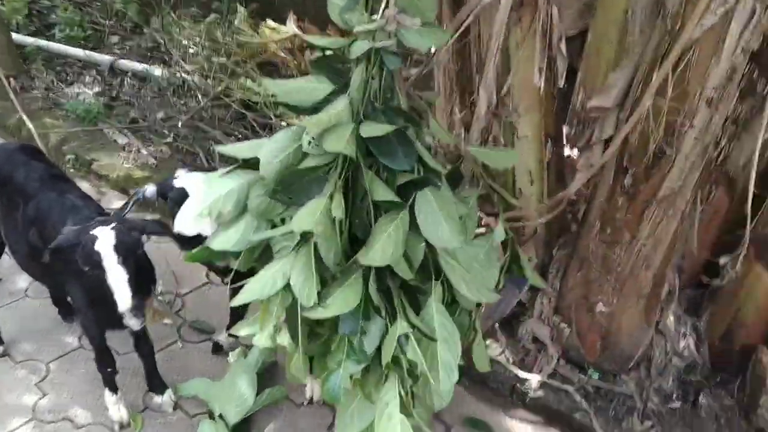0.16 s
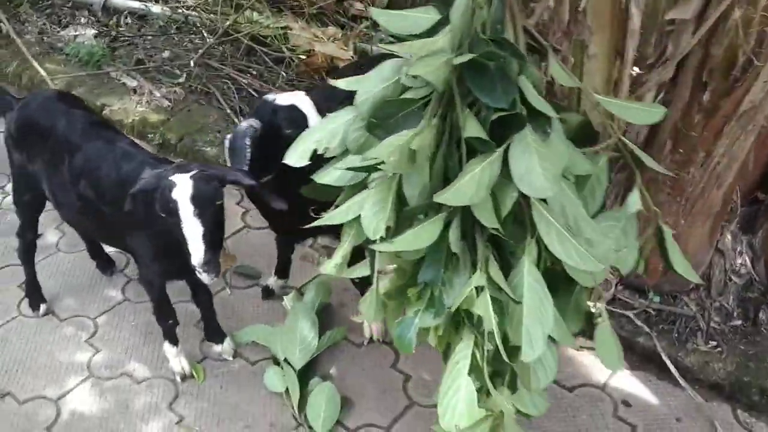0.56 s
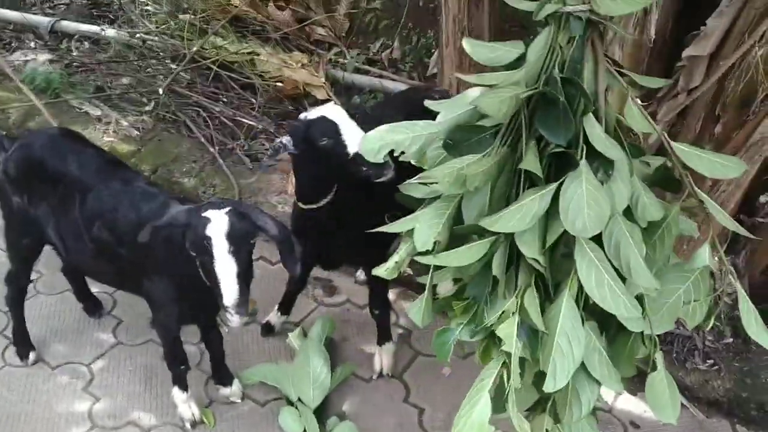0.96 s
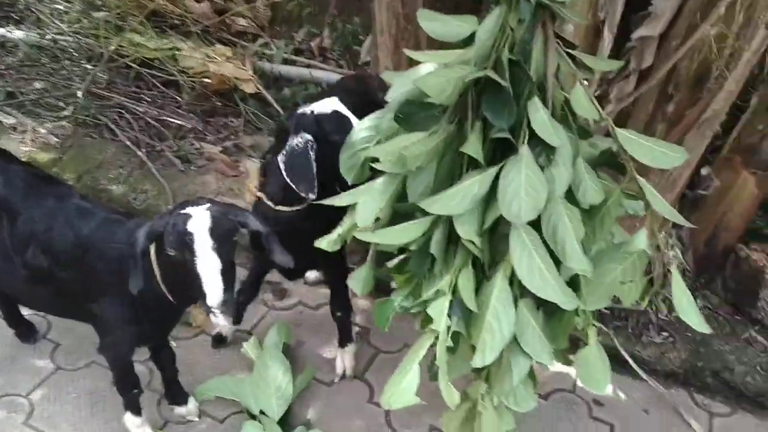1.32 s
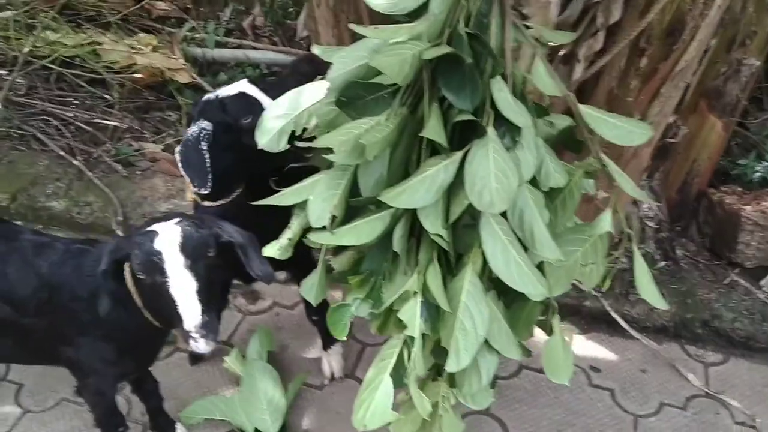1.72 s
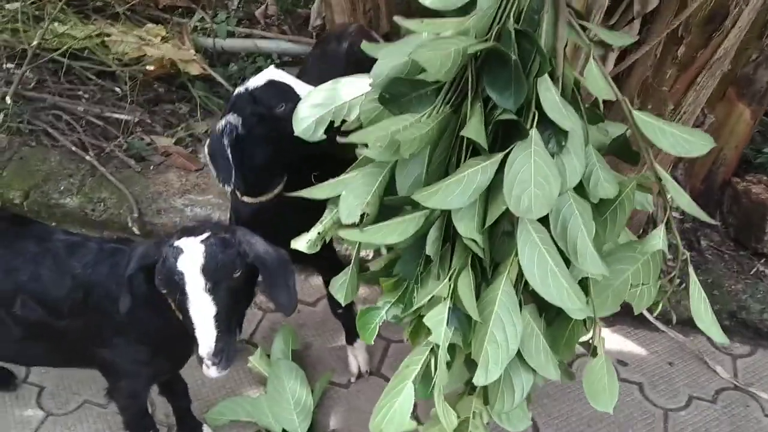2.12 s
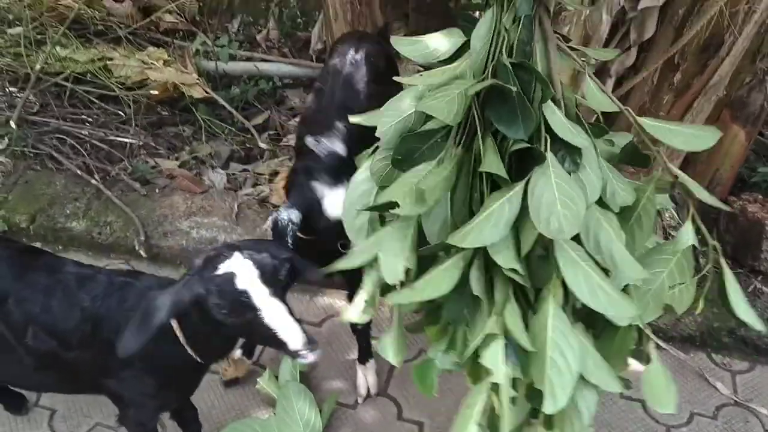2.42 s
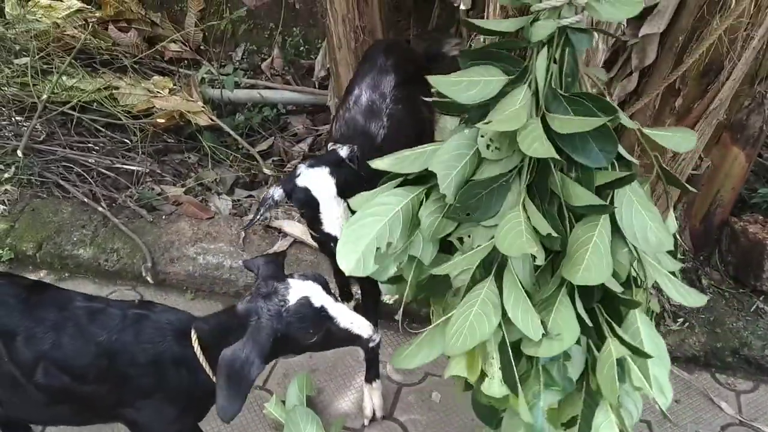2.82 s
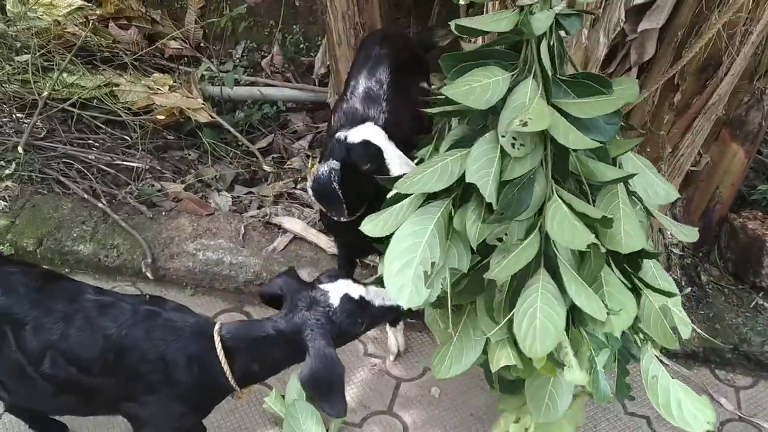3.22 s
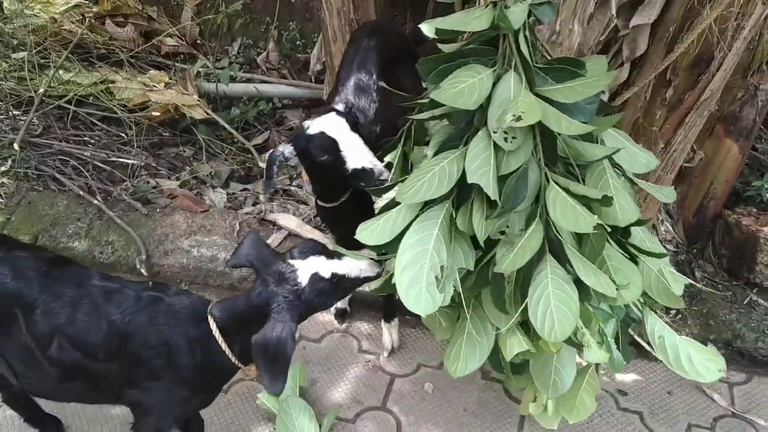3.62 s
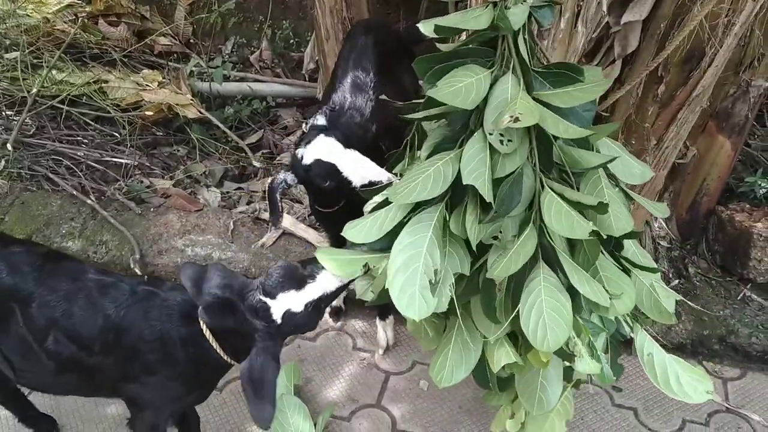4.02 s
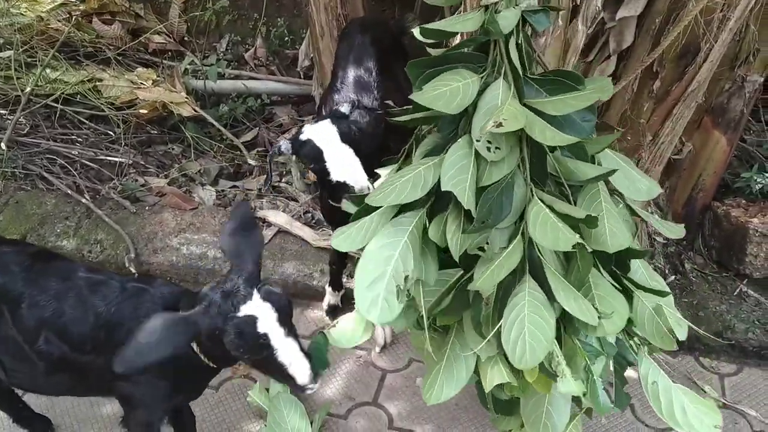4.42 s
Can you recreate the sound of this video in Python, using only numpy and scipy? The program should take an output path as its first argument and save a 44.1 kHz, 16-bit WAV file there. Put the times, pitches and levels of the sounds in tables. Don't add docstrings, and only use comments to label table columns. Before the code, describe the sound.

Leaves rustle and rip as goats tug a bundle, with sharp stalk cracks, quick bird twitter nearby and a far rising whoop over a soft outdoor hiss.

```python
import sys
import numpy as np
from scipy import signal
from scipy.fft import rfft, irfft
from scipy.io import wavfile
from scipy.ndimage import uniform_filter1d, map_coordinates

SR = 44100
rng = np.random.default_rng(int(sys.argv[2]) if len(sys.argv) > 2 else 0)


def wav_record(signal):
    frames = np.transpose(np.atleast_2d(signal))
    bounded = np.clip(frames, -1, 1)
    quanta = np.round(bounded * 32767).astype(np.int16)
    wavfile.write(sys.argv[1], SR, quanta)


def invert_db(x):
    u = np.asarray(x, float) / 20
    return 10 ** u


N = 201404


def unit(x):
    return x / np.sqrt(np.mean(x ** 2) + 1e-20)


def along(points, hz):
    point_hz, value = np.transpose(points)
    return np.interp(np.log(hz + 1), np.log(point_hz + 1), value)


def over_time(points):
    return np.interp(np.arange(N) / SR, *np.transpose(points))


def wobble(rate_hz):
    points = rng.standard_normal(int(N * rate_hz / SR) + 4)
    return map_coordinates(points, [np.arange(N) * rate_hz / SR])


def coloured(x, spectrum):
    gain = invert_db(along(spectrum, np.fft.rfftfreq(4096, 1 / SR)))
    cepstrum = irfft(np.log(gain + 1e-6))
    cepstrum[1:2048] *= 2
    cepstrum[2049:] = 0
    ring = irfft(np.exp(rfft(cepstrum)))[:2048]
    return signal.fftconvolve(x, ring)[:len(x)]


def patchy(patchy_db):
    z = signal.stft(rng.standard_normal(N + 512), nperseg=512)[2]
    field = uniform_filter1d(rng.standard_normal(z.shape), size=5, axis=0)
    field = uniform_filter1d(field, size=8, axis=1)
    noise = signal.istft(z * invert_db(patchy_db * unit(field)), nperseg=512)[1]
    return unit(noise[:N])


# pitch_hz, time_to_fall_60_db_s
TREE_ECHO = [(500, 0.55), (1000, 0.96), (2600, 0.88), (6300, 0.54), (10000, 0.2)]


def among_trees(x, wet_db, shorten):
    hz, t, z = signal.stft(rng.standard_normal(SR), SR, nperseg=256)
    t60_s = shorten * along(TREE_ECHO, hz)[:, None]
    tail = signal.istft(z * invert_db(-60 * t / t60_s), SR, nperseg=256)[1]
    tail = tail / np.sqrt(np.sum(tail ** 2) * 0.56)
    return x + invert_db(wet_db) * signal.fftconvolve(x, tail)[:N]


# pitch_hz, level_db (per Hz)
YARD_COLOUR = [(18, -45), (30, -30.5), (120, -4), (212, -14), (296, -0.5), (606, -3.5), (1180, -11.5),
               (1300, -11.5), (2860, 0), (4190, -14.5), (7070, -7.5), (7970, -23), (8980, -58.5),
               (10300, -51.5), (19800, -45)]
# time_s, level_db
LULLS = [(0, 2), (1.27, -1.5), (1.4, -6.5), (1.52, -3), (1.7, 1), (3.96, 2), (4.03, -2), (4.1, 1.5),
         (4.57, -4)]


def yard():
    breath_db = 0.8 * wobble(3) + over_time(LULLS)
    return invert_db(-59 + breath_db) * unit(coloured(patchy(patchy_db=1.5), YARD_COLOUR))


def crackle(per_s, spread_db):
    popping = rng.random(N) < per_s / SR
    size = np.minimum(rng.exponential(size=N), 4)
    sign = np.sign(rng.standard_normal(N))
    return unit(popping * invert_db(spread_db * size) * sign)


def pings(count, column_hz, scatter, cycles):
    draw = rng.random((count, 2))
    t = np.arange(600) / SR
    start = (draw[:, :1] * N).astype(int)
    hz = column_hz[start] * np.exp(scatter * rng.standard_normal((count, 1)))
    strength_db = -1.5 * np.log(draw[:, 1:] + 0.069)
    fade = invert_db(strength_db - 60 * t * hz / cycles)
    onset = 1 - np.exp(-t / 0.00012)
    ring = fade * onset * np.sin(2 * np.pi * hz * t)
    samples = (start + np.arange(len(t))).ravel()
    return unit(np.bincount(samples, ring.ravel(), N + len(t))[:N])


def swell(strokes, rest_db, steep):
    t = np.arange(N) / SR
    power = invert_db(2 * rest_db)
    for peak_s, rise_s, fall_s, db in strokes:
        away = np.maximum((peak_s - t) / rise_s, (t - peak_s) / fall_s)
        power = power + invert_db(2 * (db - steep * 20 * away))
    return 10 * np.log10(power)


# peak_s, rise_s, fall_s, rustle_db,
# brightness_db
TUGS = [(0.599, 0.041, 0.089, -40, -3.5), (0.938, 0.071, 0.082, -41.5, -5.5), (1.98, 0.13, .1, -40.5, -4),
        (2.137, 0.011, 0.081, -36, -6.5), (2.276, 0.066, 0.55, -39, -6.5), (2.333, 0.038, 0.26, -37.5, 0),
        (2.507, 0.074, 0.37, -40.5, -4), (2.593, 0.042, 0.047, -43, -8), (2.728, 0.053, 0.028, -37.5, -7),
        (4.2, 0.16, .1, -44.5, -18), (4.216, 0.0034, 0.024, -31, 2), (4.282, 0.055, 0.13, -33.5, -0.5),
        (4.35, 0.2, 0.092, -34.5, -0.5), (2.44, 0.059, 0.019, -39, -18), (0.005, .1, 0.12, -51.5, 0.5),
        (1.03, 0.28, 0.16, -55.5, 4)]
# peak_s, rise_s, fall_s, rustle_db, brightness_db
STIRS = [(.07, 0.11, .3, -50, -3), (.5, 0.28, 0.082, -54.5, 0), (.77, .1, 0.21, -51, -3),
         (1.17, 0.6, 0.42, -53, -2.5), (1.59, 0.1, 0.056, -48, -7), (1.89, 0.61, .2, -56, -5.5),
         (2.66, .2, 0.36, -58, -16), (2.788, 0.017, 0.14, -45.5, -4), (2.964, 0.08, 0.026, -47.5, -5.5),
         (3.3, 1.35, 4.5, -55, -3), (3.8, 1.9, 0.11, -57, -24), (3.978, 0.068, 0.038, -64, -9),
         (4.51, 0.22, .3, -54, -18), (4.56, 0.076, .3, -56.5, 3)]
# peak_s, rise_s, fall_s, level_db
NUDGES = [(2.129, 0.0037, 0.054, -38.5), (2.325, .005, 0.072, -46), (2.43, 0.05, 0.045, -49),
          (2.288, 0.08, 0.22, -47.5), (2.509, .05, 0.094, -43.5), (2.593, 0.021, 0.085, -45.5),
          (2.726, 0.082, 0.017, -48), (2.786, 0.0053, 0.026, -53.5), (2.8, 0.12, 0.35, -57)]
# time_s, pitch_hz
BLADE_PITCH = [(0, 2593), (1.0, 2737), (1.101, 2400), (1.9, 2555), (2.0, 2830), (2.3, 2777), (2.6, 2285),
               (2.72, 2686), (4.1, 2680), (4.3, 3154), (4.57, 2900)]
# pitch_hz, level_db
LEAF_COLOUR = [(900, -50.5), (1500, -10), (2300, -1.5), (3000, 5), (3500, -1.5), (3900, -11.5), (4400, -52)]
# pitch_hz, level_db
EDGE_COLOUR = [(3300, -51.5), (4000, -6), (5200, -3), (6500, -1), (7500, -2), (8300, -15), (8900, -39),
               (9600, -53.5), (11000, -120)]
# pitch_hz, level_db
STALK_COLOUR = [(60, -52.5), (150, -13), (300, -2.5), (600, -6), (1000, 1.5), (1500, -2.5), (2000, -4),
                (2600, -69.5)]
# pitch_hz, level_db
DUST_COLOUR = [(7000, -56), (8800, 18), (10500, 5.5), (12000, 2), (15300, 6), (16000, -51.5)]
# pitch_hz, level_db
TREBLE_LOSS = [(20, 0), (7500, 0), (9500, -40), (11000, -80)]


def leaves():
    strokes = [*TUGS, *STIRS]
    rustle = [(*shape, db) for *shape, db, bright in strokes]
    sizzle = [(*shape, db + bright) for *shape, db, bright in strokes]
    pushes = [(*shape, db - 18) for *shape, db, bright in strokes] + [*NUDGES]
    dust = [(*shape, -69.5 + (db + 41) + 2 * bright) for *shape, db, bright in TUGS]
    dust += [(*shape, db - 36.5) for *shape, db in NUDGES]
    rustle_db = swell(rustle, rest_db=-63.5, steep=1)
    sizzle_db = swell(sizzle, rest_db=-72, steep=1)
    stalk_db = swell(pushes, rest_db=-63.5, steep=1)
    dust_db = swell(dust, rest_db=-116, steep=1.45)

    pops = crackle(per_s=900, spread_db=1.5)
    blade_pings = pings(count=2500, column_hz=over_time(BLADE_PITCH), scatter=0.1116, cycles=92)
    edge_pings = pings(count=2500, column_hz=np.full(N, 6200), scatter=0.16, cycles=73)
    blade_hiss = coloured(0.26 * pops + patchy(patchy_db=1), LEAF_COLOUR)
    blades = coloured(unit(unit(blade_hiss) + 0.8 * blade_pings), TREBLE_LOSS)
    edges = unit(coloured(0.5 * pops + patchy(patchy_db=2) + 0.3 * edge_pings, EDGE_COLOUR))
    stalks = unit(coloured(0.52 * pops + patchy(patchy_db=1.5), STALK_COLOUR))
    fine_dust = unit(coloured(0.3 * pops + patchy(patchy_db=1), DUST_COLOUR))

    bundle = invert_db(rustle_db) * blades + invert_db(sizzle_db) * edges + invert_db(stalk_db) * stalks
    flutter_db = 1.52 * wobble(25.026) + 1.2 * wobble(70)
    return invert_db(flutter_db) * (invert_db(-2) * bundle + invert_db(dust_db) * fine_dust)


def snaps(events, t60_s, crack, rise_s):
    out = np.zeros(N + SR)
    t = np.arange(SR // 8) / SR
    shape = crack * invert_db(-60 * t / 0.0011) + invert_db(-60 * t / t60_s)
    shape = shape * np.minimum(t / rise_s, 1)
    for start_s, db, bright_db, dull_db, blade_hz in events:
        burst = rng.standard_normal(len(t)) * shape
        leaf_colour = [(hz * blade_hz / 2900, gain) for hz, gain in LEAF_COLOUR]
        parts = [coloured(burst, colour) for colour in (leaf_colour, EDGE_COLOUR, STALK_COLOUR)]
        blade, edge, stalk = [part / np.abs(part).max() for part in parts]
        sound = blade + invert_db(bright_db) * edge + invert_db(dull_db) * stalk
        out[round(start_s * SR):][:len(t)] += invert_db(db - 7.5) * sound
    return coloured(out[:N], TREBLE_LOSS)


# start_s, peak_db, bright_db, blade_hz
TEARS = [(0.453, -45, -13, 2880), (0.5786, -32.5, -15, 2850), (0.639, -46, -13, 2900),
         (0.9374, -61, -14, 2900), (0.9807, -39, -9, 2770), (1.5968, -34.5, -20, 3100),
         (1.9151, -37, -3, 2470), (1.9654, -25, -24, 2690), (2.0942, -39, -21, 2880),
         (2.145, -29, -19, 2980), (2.2663, -49, -16, 2560), (2.439, -24.5, -13.5, 2840),
         (2.4992, -22, -24, 2265), (2.5654, -28, -2, 2330), (2.7209, -38, -6, 2870),
         (2.8652, -33.5, -17, 1950), (2.938, -39, -8, 2910), (2.963, -43, -16, 2290),
         (3.049, -52, -33, 2960), (3.093, -38, 2.5, 2630), (3.9691, -38.5, -2, 2900),
         (4.1428, -31.5, -19, 2870), (4.1754, -34, -1, 2950), (4.224, -34.5, 11.5, 3000),
         (4.2461, -26, -17, 3400), (4.2697, -30, -19, 2670), (4.335, -23, -9, 3270), (4.526, -38, 1, 2200)]


def tears():
    events = [(start_s, db, bright_db, -24, blade_hz) for start_s, db, bright_db, blade_hz in TEARS]
    return snaps(events, t60_s=0.053, crack=0, rise_s=0.0045)


def glide(row, peak, edge_db):
    start_s, length_s, from_hz, to_hz, db = row
    peak_hz = from_hz + peak * (to_hz - from_hz)
    return [(start_s, from_hz, db - edge_db),
            (start_s + peak * length_s, peak_hz, db),
            (start_s + length_s, to_hz, db - edge_db)]


def note(points, tones, rough_hz):
    s, hz, db = np.transpose(points)
    start = int(s[0] * SR)
    t = np.arange(start, min(int(s[-1] * SR), N)) / SR
    shake = 8 * uniform_filter1d(rng.standard_normal(N // 6), size=60)[:len(t)]
    phase = 2 * np.pi * np.cumsum(np.interp(t, s, hz) + rough_hz * shake) / SR
    edges = np.clip(np.minimum(t - s[0], s[-1] - t) / 0.004, 0, 1)
    voice = sum(invert_db(gain_db) * np.sin(round(multiple) * phase) for multiple, gain_db in tones)
    out = np.zeros(N)
    out[start:][:len(t)] = edges * invert_db(np.interp(t, s, db) + 2.5) * voice
    return out


# start_s, length_s, from_hz, to_hz, peak_db
CAWS = [(.49, 0.15, 1510, 1720, -53.5), (1.0, .25, 2060, 1800, -61.5), (1.48, 0.26, 1650, 1800, -55),
        (2.69, .21, 1800, 1750, -53), (.58, 0.066, 2850, 2850, -51.5)]
CAW_PEAKS = (.5, .25, .5, .25, .3)
CAW_ROUGHNESS = (120, 100, 180, 250, 60)


def caws():
    calls = zip(CAWS, CAW_PEAKS, CAW_ROUGHNESS)
    dry_caws = sum(note(glide(row, peak, edge_db=11), [(1, 0)], rough_hz) for row, peak, rough_hz in calls)
    return among_trees(dry_caws, wet_db=-3.5, shorten=0.38)


# start_s, length_s, from_hz, to_hz, peak_db
TWITTER = [(.515, 0.022, 5320, 6340, -49.5), (.635, 0.027, 5360, 6500, -50.5),
           (.71, 0.044, 4800, 5700, -58.5), (.734, .012, 3550, 4540, -51.5),
           (.744, .018, 4530, 4040, -50.5), (.775, .04, 4200, 4500, -68), (.81, .035, 4500, 5300, -55.5),
           (.888, 0.015, 6550, 5570, -47), (.836, .012, 4920, 6860, -44), (.98, .03, 3970, 5430, -46.5),
           (1.078, 0.014, 4800, 7330, -44), (4.53, 0.054, 5400, 6040, -53.5)]
# start_s, length_s, from_hz, to_hz, peak_db
FAR_CHIRPS = [(3.616, .04, 4700, 5600, -58), (3.7, .05, 4150, 4750, -64), (3.745, .028, 4750, 5000, -55)]
# start_s, length_s, from_hz, to_hz, peak_db
HELD = (1.16, .14, 6220, 6240, -60)
# after_start_s, share_of_held_pitch, level_db
HOOK = [(0, .82, -6), (.007, 1.1, -3), (.012, 1.17, -7), (.02, 1.125, -4), (.028, 1.03, -1), (.04, 1.0, 0),
        (.058, 1.0, -7), (.075, 1.0, -18)]
# start_s, stretch_factor, held_hz, level_db
HOOKS = [(0.851, 0.93, 6510, -47), (1.09, 1.0, 6190, -43)]


def twitter():
    notes = [glide(row, peak=0.55, edge_db=6) for row in [*TWITTER, *FAR_CHIRPS, HELD]]
    for start_s, stretch, held_hz, db in HOOKS:
        notes.append([(start_s + stretch * after_s, share * held_hz, db + level_db)
                      for after_s, share, level_db in HOOK])
    song = sum(note(points, [(1, 0)], rough_hz=50) for points in notes)
    return among_trees(song, wet_db=-6.5, shorten=0.32)


# start_s, peak_db, pitch_hz
THUDS = [(0.619, -47, 302), (0.932, -52.5, 269), (1.482, -55.5, 163), (2.145, -54, 295), (2.339, -53, 306),
         (2.496, -40, 293), (2.515, -42, 298), (2.532, -44, 300), (2.556, -36.5, 290), (2.594, -40.5, 240),
         (2.621, -31, 276), (4.206, -45, 331),
         (1.478, -64, 94), (2.509, -58, 88), (2.588, -69, 100)]
# pitch_hz, level_db
MIC_BASS = [(20, -28), (45, -10.5), (90, 2.5), (20000, -3.5)]


def thuds():
    out = np.zeros(N + SR)
    t = np.arange(SR // 8) / SR
    onset = 1 - np.exp(-t / 0.0047)
    for start_s, db, hz in THUDS:
        fade = invert_db(db + 3 - 60 * t * hz / 8)
        out[round(start_s * SR):][:len(t)] += fade * onset * np.sin(2 * np.pi * hz * t)
    return coloured(out[:N], MIC_BASS)


# start_s, peak_db, bright_db, dull_db, blade_hz
CRACKS = [(1.5004, -52, -19, 16, 2180), (2.3226, -15, 1.5, -9.5, 2480), (2.3304, -18.5, 6.5, -35, 2160),
          (2.7843, -30, -8, -9, 2490), (4.1036, -28.5, -5, -16, 3050), (4.2153, -13, -11, -22, 3590),
          (4.2184, -10.5, -3.5, -33, 2980), (4.3274, -22, -11, -23, 3380)]


def stalk_cracks():
    return snaps(CRACKS, t60_s=0.02, crack=2.5, rise_s=0.0001)


# start_s, length_s, from_hz, to_hz,
# peak_db
WHOOP = [(3.17, .42, 655, 680, -48), (3.281, 0.23, 690, 917.4, -47.5)]
STEP_PEAKS = (.45, .4)
# time_s, pitch_hz, level_db
WHOOP_TOP = [(3.35, 984, -63), (3.376, 966.6, -52), (3.435, 955, -46), (3.5, 948, -54.5), (3.66, 953, -63),
             (3.715, 946, -73), (3.775, 963, -60.5), (3.83, 953, -72), (3.95, 955, -74)]
WHOOP_ROUGHNESS = (85, 120, 36)
# multiple_of_pitch, level_db
WHOOP_TONES = [(1, 0.5), (2, -5), (3, 0.5)]
# pitch_hz, level_db
THROAT = [(400, -9.5), (700, -0.5), (1000, 1), (1450, -15), (2200, -1.5), (2900, -8), (4000, -34)]


def whoop():
    steps = [glide(row, peak, edge_db=15) for row, peak in zip(WHOOP, STEP_PEAKS)] + [WHOOP_TOP]
    voice = sum(note(points, WHOOP_TONES, rough_hz) for points, rough_hz in zip(steps, WHOOP_ROUGHNESS))
    since_crest_s = np.arange(N) / SR - 3.435
    throb_db = 3 * np.cos(2 * np.pi * 16.26 * since_crest_s)
    return among_trees(coloured(invert_db(throb_db) * voice, THROAT), wet_db=-7, shorten=0.35)


# time_s, pitch_hz, level_db
WHISTLE = [(3.495, 4150, -68), (3.512, 3600, -53), (3.54, 3150, -55), (3.58, 2880, -50), (3.615, 2700, -44),
           (3.635, 2440, -49), (3.65, 2590, -50), (3.71, 2595, -58), (3.83, 2600, -70)]


def whistle():
    return among_trees(note(WHISTLE, [(1, 0)], rough_hz=130), wet_db=-1, shorten=0.3)


def scene():
    near = among_trees(tears() + thuds() + stalk_cracks(), wet_db=-9, shorten=0.078)
    birds = caws() + twitter() + whoop() + whistle()
    return (yard() + leaves() + near + birds)[None]


def band_limit(x):
    return signal.sosfilt(signal.butter(12, 15500, fs=SR, output="sos"), x)


def record(dry):
    return band_limit(dry)


dry = scene()
out = record(dry)
wav_record(out)
```